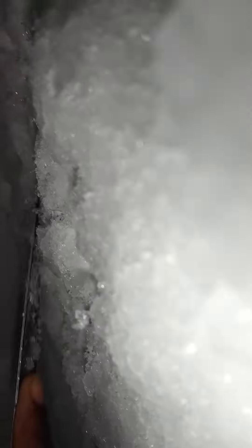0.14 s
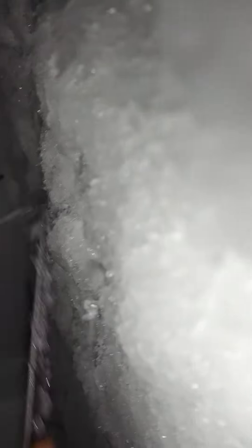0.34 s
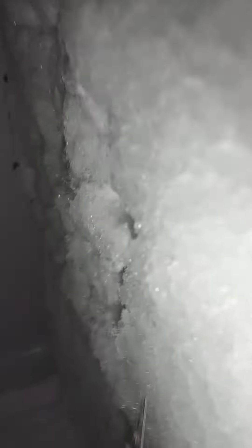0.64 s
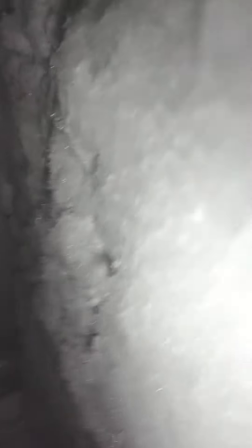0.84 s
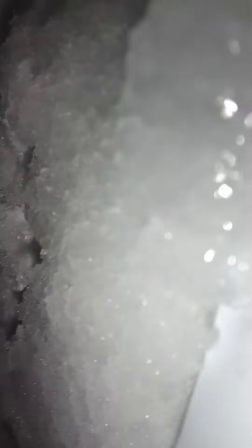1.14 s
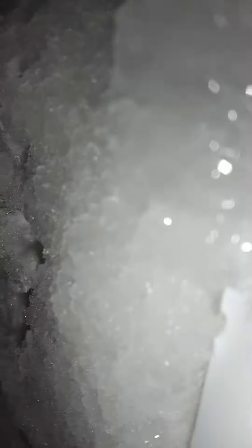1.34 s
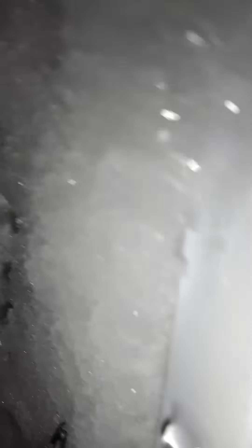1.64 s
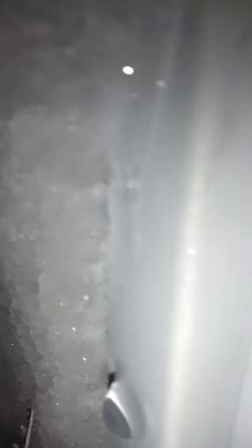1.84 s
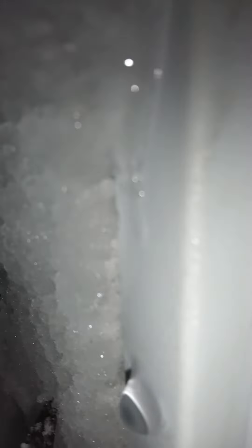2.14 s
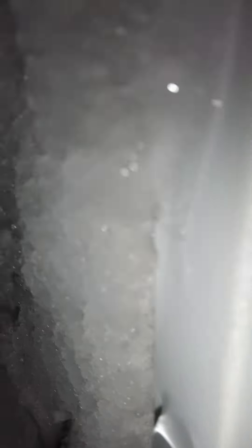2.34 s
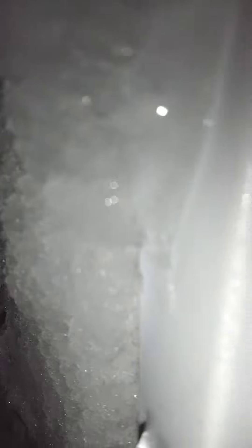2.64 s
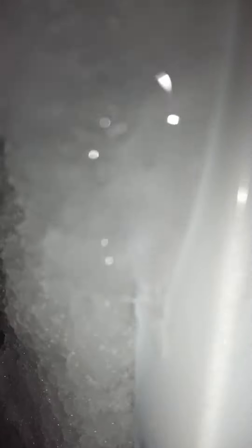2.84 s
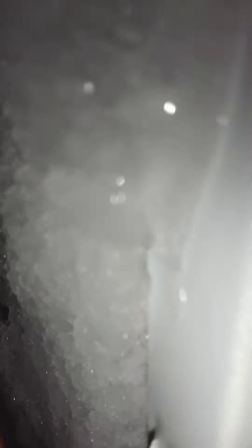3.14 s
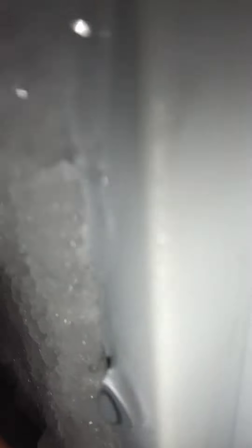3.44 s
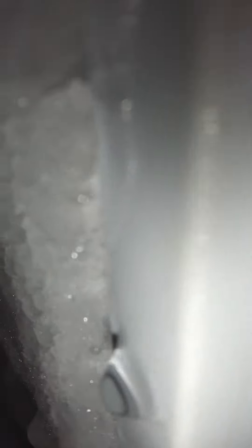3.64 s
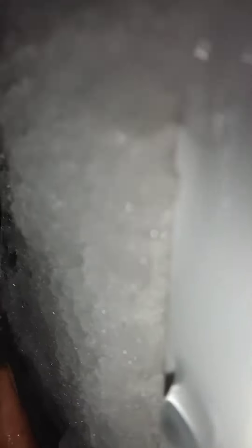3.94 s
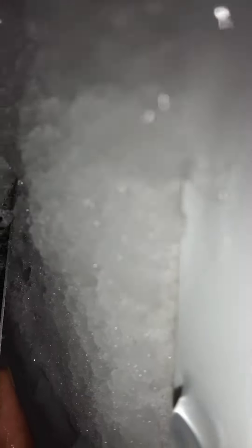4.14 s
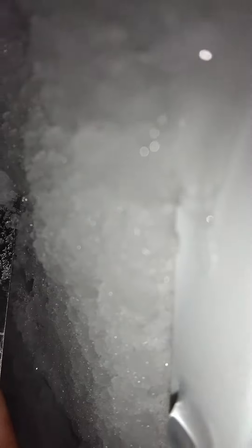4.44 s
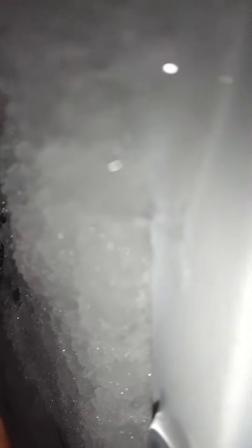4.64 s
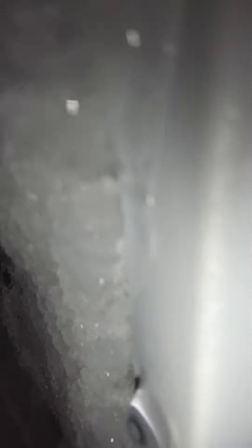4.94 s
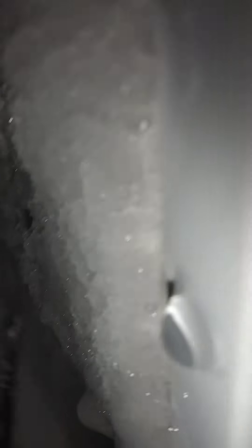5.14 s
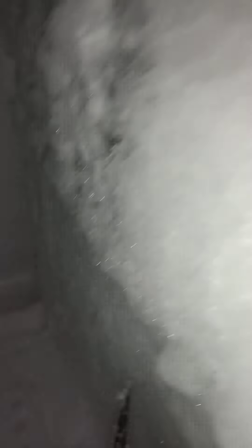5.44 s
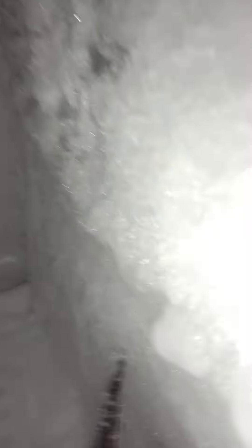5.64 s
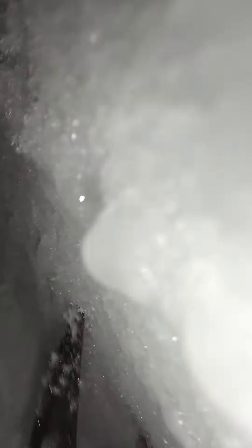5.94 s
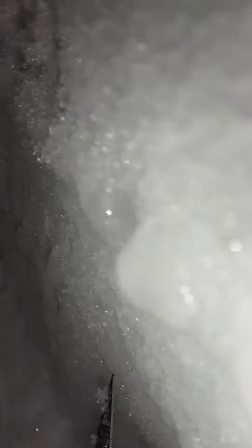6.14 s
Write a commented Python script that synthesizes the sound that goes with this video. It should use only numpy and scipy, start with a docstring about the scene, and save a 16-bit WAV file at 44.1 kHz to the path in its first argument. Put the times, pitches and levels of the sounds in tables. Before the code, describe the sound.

Close, dry cracks and gritty scrapes of a blade on crusted ice, dull thumps of a hollow freezer wall, icy grains falling between bursts.

```python
"""A knife jabs, chips and scrapes thick frost in a freezer, close by, amid knocks and falling crumbs.
Each contact is a run of tiny fractures, which excite ice crystals and, the deeper the bite, the blade's bending modes.
Jabs set the hollow wall swinging, loose grains tick down in flurries, and the edge squeaks at times.
Wall modes and decaying echoes prolong all of this, over the faint hush of a kitchen."""
import sys
import numpy as np
from scipy import signal
from scipy.fft import rfft, irfft
from scipy.io import wavfile
from scipy.ndimage import map_coordinates

SR = 44100
rng = np.random.default_rng(int(sys.argv[2]) if len(sys.argv) > 2 else 0)


def unload_audio(sound):
    """Save the sound as a 16-bit wav file, at the path given as the first command line argument."""
    columns = np.transpose(np.atleast_2d(sound))
    # keep every value between -1 and 1, then stretch to whole-number steps
    steps = np.round(np.clip(columns, -1, 1) * 32767)
    wavfile.write(sys.argv[1], SR, steps.astype(np.int16))


N = 276948

# Single flakes snapping off: t/s, level/dB, depth of the bite/dB
CHIPS = [(0.159, -38, 1.5), (0.452, -52, 11.5), (0.564, -37, -1.5), (.596, -44, 8), (.618, -61, -1),
         (.641, -36.5, -2), (.679, -48, 0), (.69, -43, -2), (0.696, -45, -12), (0.707, -46.5, 3),
         (0.723, -41.5, -1), (0.739, -42, -24), (0.743, -41.5, -4), (0.755, -45, -13), (.762, -46, -21),
         (0.79, -47.5, -1), (0.796, -47.5, 8), (1.079, -50.5, -16.5), (1.109, -48.5, -3.5),
         (1.177, -55, -9), (1.196, -48, -14), (1.213, -46.5, -2), (1.222, -44, -7), (1.247, -41, -18),
         (1.267, -41.5, -11.5), (1.309, -45, -12), (1.34, -47.5, -8), (1.363, -35, -34), (1.371, -39.5, -4),
         (1.425, -36.5, 2), (1.588, -43.5, -13), (1.607, -50, 1), (1.679, -54, -33), (1.826, -47.5, -17.5),
         (1.914, -50.5, -45), (2.079, -57, -59), (2.152, -48.5, -67), (2.255, -58, -46), (2.49, -53, -0.5),
         (2.729, -48.5, -14), (2.795, -49, -22), (2.851, -53.5, -17.5), (2.874, -61.5, 16),
         (3.048, -45.5, -18), (3.254, -38, -14.5), (3.315, -37.5, 5), (3.329, -41, 6), (3.378, -41.5, 9),
         (3.749, -45, -44), (3.808, -55.5, 8), (3.91, -56.5, -70.5), (3.972, -47, -21),
         (4.014, -40.5, -12.5), (4.14, -42, -2.5), (4.255, -30.5, 0.5), (4.391, -32.5, 7),
         (4.401, -31.5, 6.5), (4.41, -31, 9.5), (4.43, -35, -8.5), (4.438, -34.5, -0.5), (4.449, -29, -0.5),
         (4.567, -46.5, -10), (4.614, -39, -14), (4.662, -43.5, -15), (4.736, -44.5, -14.5),
         (4.895, -50, -3.5), (5.101, -53.5, -35), (5.418, -48.5, -25), (5.484, -39.5, -6),
         (5.516, -49.5, -14), (5.581, -41.5, -13), (5.633, -39, -11), (6.061, -56, -50), (6.168, -45, 3.5),
         (6.195, -37.5, -11), (6.209, -36.5, -8.5), (6.221, -37.5, -7), (6.251, -51, -3)]
CRACK_GROWTH = .3  # dB by which a crack lengthens for each dB of depth


def chips(crack_s=0.0026, first_break=2.36, lead_db=-27, lead_s=0.02, snap_s=0.0031):
    """Brittle fracture: a short soft crackle swells into each main break, whose run dies later if deep."""
    out = np.zeros(N)
    t = clock(.026) - .006  # zero at the main break
    stream = fractures(rate=2000, spread_db=2.5)
    flakes = rng.standard_normal((len(CHIPS), 1024))
    for (start, db, depth_db), flake in zip(CHIPS, flakes):
        run_s = crack_s * undb(CRACK_GROWTH * depth_db)
        crackle = undb(lead_db) * np.exp(-abs(t) / lead_s)
        run = np.exp(-abs(t) / run_s)
        force = excerpt(stream, start, t) * np.where(t < 0, crackle, run)
        force[np.searchsorted(t, 0)] += first_break
        add(out, start + t[0], radiate(force, start, db, depth_db, snap_s, flake, ring_s=0.0015))
    return out


# Strokes of the blade ploughing through frost: start t/s, end t/s, level/dB, depth of the bite/dB
STROKES = [(0.154, 0.161, -55, 10), (0.482, 0.497, -70, 13.5), (0.533, 0.574, -49, -1),
           (0.6, 0.622, -68, 19.5), (0.679, 0.708, -60, 11.5), (0.718, 0.761, -61, 9),
           (1.204, 1.265, -66.5, 4.5), (1.332, 1.388, -50, -1.5), (1.383, 1.408, -41, -2),
           (1.418, 1.444, -45, 0), (1.905, 1.957, -64, -56), (2.116, 2.161, -63.5, -57),
           (2.471, 2.503, -50.5, -12.5), (2.723, 2.752, -55.5, -8.5), (2.83, 2.893, -54.5, -3),
           (3.03, 3.076, -52.5, -1.5), (3.26, 3.278, -43.5, -0.5), (3.311, 3.374, -41, -2),
           (3.849, 3.916, -65, -10.5), (3.981, 4, -46, -7.5), (4.098, 4.156, -56.5, -19),
           (5.096, 5.13, -59, -7), (5.418, 5.459, -51.5, -13.5), (5.457, 5.498, -48, -4),
           (5.638, 5.706, -45.5, -4.5), (6.157, 6.237, -67.5, 7)]
SWELL_DB = 10.5  # growth of the push through every stroke
WALL_DB, WALL_HZ = -49, 151  # level and pitch of the wall's rumble under a firm stroke
FIRM_DB = -47.5  # level plus depth of a firm stroke
WALL_GROWTH = 1.75  # dB of rumble for each dB above a firm stroke


def scrapes(grip_db=4, slip_hz=190, attack_s=0.0049, release_s=0.01, wall_s=0.002):
    """Stick-slip friction: the edge breaks the crust in bunches of fractures; deep strokes shake the wall."""
    out = np.zeros(N)
    stream = fractures(rate=7000, spread_db=1) * undb(grip_db * wander(slip_hz))
    flakes = rng.standard_normal((len(STROKES), 1024))
    wall = np.sin(2 * np.pi * WALL_HZ * clock(.12)) * np.exp(-clock(.12) / wall_s)
    wall = signal.sosfilt(signal.butter(3, 110, "high", fs=SR, output="sos"), wall)
    for (start, end, db, depth_db), flake in zip(STROKES, flakes):
        t = clock(end - start)
        swell = undb(SWELL_DB * t / t[-1])
        edges = np.minimum(t / attack_s, 1) * np.minimum((t[-1] - t) / release_s, 1)
        force = excerpt(stream, start, t) * swell * edges
        add(out, start, radiate(force, start, db, depth_db, t[-1], flake, ring_s=0.0013))
        rumble_db = WALL_DB + WALL_GROWTH * (db + depth_db - FIRM_DB)
        rumble = unit(signal.fftconvolve(force, wall)) * np.sqrt(len(t))
        add(out, start, undb(rumble_db) * rumble)
    return out


# The clamping of the blade by the ice, which retunes its bending modes; the nearest in time applies:
# t/s, nominal f/Hz of modes 1, 2, 3 and 4, mode 2 relative to mode 1 level/dB,
# upper pair relative to the crystals at zero depth level/dB
GRIPS = [(.16, 660, 1330, 2290, 2730, 4.5, -2), (.47, 938, 1310, 2250, 2770, -4, 8.5),
         (.555, 577, 1316, 2190, 2790, -2, -1.5), (.61, 766, 1310, 1920, 2200, -5, -2.5),
         (.72, 800, 1083, 2800, 3620, 1.5, -1), (1.16, 680, 1035, 2230, 3160, 8.5, 2.5),
         (1.39, 865, 1343, 2300, 3044, -2, -3), (1.85, 895, 1290, 2100, 3100, -10, 14),
         (2.48, 840, 1120, 2040, 3340, -14, -5), (2.73, 955, 1154, 2115, 3000, -2, -1.5),
         (2.9, 707, 1316, 2150, 2300, -9, -4), (3.265, 624, 1306, 2121, 2400, 3.5, -5),
         (3.33, 743, 1420, 2110, 2720, 2.5, -6.5), (3.81, 913, 1310, 2130, 2155, -13, -3.5),
         (3.99, 1280, 1520, 2170, 2530, -1.5, -14.5), (4.14, 800, 1305, 2209, 3360, -3, -15.5),
         (4.26, 503, 1380, 2403, 2840, -4.5, -3.5), (4.41, 860, 1390, 2365, 2750, -2.5, -2),
         (4.66, 1242, 2010, 2721, 3570, 5, -4.5), (4.89, 520, 1286, 2150, 2270, -9, -10),
         (5.46, 932, 1100, 1943, 2180, -13, 0), (5.66, 892, 1353, 1900, 2380, -2.5, -0.5),
         (6.2, 512, 964, 2099, 3310, 0.5, -1)]
UPPER_PER_DEPTH = 0.74  # dB of the upper modes for each dB of depth


def radiate(force, start, db, depth_db, seconds, flake, ring_s, lower_s=0.0049, upper_s=0.0027):
    """Modal excitation: a graze only sounds the crystals, a deep bite also bends the blade."""
    grip = min(GRIPS, key=lambda row: abs(row[0] - start))
    _, first_hz, second_hz, third_hz, fourth_hz, second_db, upper_db = grip
    t = np.arange(len(flake)) / SR
    crystal = signal.fftconvolve(flake * np.exp(-t / ring_s), response(crystal_colour(start)))
    out = np.zeros(len(force) + SR // 10)
    add(out, 0, undb(db) * unit(signal.fftconvolve(force, crystal)))
    lower_db = db + depth_db
    upper_db = db + upper_db + UPPER_PER_DEPTH * depth_db
    lower = bending(force, first_hz, lower_db, lower_s)
    lower = lower + undb(second_db) * bending(force, second_hz, lower_db, lower_s)
    upper = bending(force, third_hz, upper_db, upper_s)
    upper = upper + bending(force, fourth_hz, upper_db, upper_s)
    add(out, 0, undb(lower_db) * unit(lower) + undb(upper_db) * unit(upper))
    return out * np.sqrt(seconds * SR)


# Colour of breaking ice, from thick crust to fine crystals: f/Hz, relative level/dB
CRYSTAL = [(1700, -11), (2500, -2), (3800, 7), (5500, 6), (6700, 7.5), (7700, 12), (8900, -4), (11000, -6),
           (13500, -4), (15300, 0.5), (16000, -30)]
# Sparkle of the frost, high when fine and dry, low when packed: t/s, change of the top treble level/dB
SPARKLE = [(.2, -1), (.6, 7.5), (2.3, 11), (3.3, 1.5), (4.42, -4), (4.6, 8), (5.4, 4.5)]


def crystal_colour(start):
    """Spectral envelope: the ice's colour at a time, its treble raised or lowered by the sparkle."""
    hz, db = np.transpose(CRYSTAL)
    sparkle_db = np.interp(start, *np.transpose(SPARKLE))
    return np.column_stack([hz, db + sparkle_db * (hz > 8500)])


def bending(force, hz, db, decay_s, hard_db=-41, shift=0.02, shift_hz=70):
    """Damped resonance: one bending mode rings, shorter under a hard push, its pitch sliding with the grip."""
    t = clock(.05)
    hz = hz * (1 + rng.uniform(-.04, .04))  # every flake grips a little differently
    age = t / (decay_s * (1 - .82 / (1 + undb(hard_db - db))))  # in decay times
    mode = np.exp(2j * np.pi * (hz * t + rng.random()) - age) * (1 - np.exp(-age))
    rung = signal.fftconvolve(force, mode)
    slide = 2 * np.pi * hz * shift * np.cumsum(wander(shift_hz, len(rung))) / SR
    return unit(np.real(rung * np.exp(1j * slide)))


# Pushes that reach the wall: t/s, relative level/dB, middle of the sagging pitch f/Hz, decay time/cycles
KNOCKS = [(.165, -53, 198, 5.6), (0.544, -38.5, 210, 0.2), (0.7, -38.5, 199, 1.76),
          (1.257, -42.5, 223, 0.82), (1.378, -35.5, 420, 0.51), (1.4, -32.5, 328, 0.34),
          (1.432, -28.5, 206, 0.2), (1.609, -26, 274, 0.24), (1.611, -47, 650, 1.3), (1.938, -73, 475, 4.9),
          (3.062, -37.5, 179, 1.02), (3.266, -29.5, 182, 3), (3.34, -26.5, 490, 0.82),
          (3.346, -13, 272, 0.4), (3.352, -25, 326, 0.27), (3.362, -23.5, 127, 0.41), (4.014, -40, 173, 1),
          (4.143, -37.5, 186, 1.4), (4.26, -21.5, 280, 0.18), (4.414, -25.5, 135, 0.22),
          (4.896, -46.5, 523, 1.5), (5.691, -35, 198.7, 2.8), (5.698, -37, 357, 2.4), (5.82, -57, 507, 7.9),
          (6.254, -45, 578, 0.83)]


def knocks(swing_db=6.0, sag=0.054, judder_db=-49.0, judder_growth=0.49, build_s=0.0047, release_s=0.013):
    """Elastic rebound: the wall judders as the push builds, then springs back in a swing of sagging pitch."""
    out, t = np.zeros(N), clock(.08)
    around = clock(.1) - .04  # zero at the peak of the push
    push = np.exp(-abs(around) / np.where(around < 0, build_s, release_s))
    shudder = rng.standard_normal(N)
    for start, db, hz, cycles in KNOCKS:
        fading = np.exp(-t * hz / cycles)
        turns = np.cumsum(hz * (1 + sag * (2 * fading - 1))) / SR
        swing = np.sin(2 * np.pi * turns) * fading * (1 - np.exp(-t * hz * np.pi))
        add(out, start, undb(db + swing_db) * swing / np.sqrt(cycles))
        judder = unit(signal.fftconvolve(excerpt(shudder, start, around) * push, swing))
        judder = judder * np.sqrt((build_s + release_s) * SR)
        add(out, start + around[0], undb(judder_db + judder_growth * (db - FIRM_DB)) * judder)
    return high_pass(out, hz=86.0)


# Skids of the edge on glazed ice: start t/s, end t/s, level/dB, nominal pitch f/Hz
SQUEAKS = [(1.9, 2.13, -73, 3480), (3.742, 3.8, -70, 2700), (5.893, 5.97, -79, 3050)]


def squeaks(waver=.035, rough_db=6, slip_hz=420):
    """Frictional self-oscillation: the skidding edge sings one tone, unsteady in pitch and level."""
    out = np.zeros(N)
    for start, end, db, hz in SQUEAKS:
        size = len(clock(end - start))
        tone = np.sin(2 * np.pi * np.cumsum(hz * (1 + waver * wander(slip_hz, size))) / SR)
        swell = np.sqrt(np.hanning(size)) * undb(rough_db * wander(slip_hz, size))
        add(out, start, undb(db) * unit(tone * swell) * np.sqrt(size))
    return out


# Colour of loose crumbs: f/Hz, relative level/dB
CRUMB_COLOUR = [(2400, -27.5), (3800, -4), (5500, -3), (7500, 6.5), (8900, -7.5), (13500, -5.5),
                (15300, -0.5), (16000, -5)]
FLURRY_DB, FLURRY_HZ = 4.5, 22  # spread of the clusters' level, clusters a second


def crumbs(drift_db=2, drift_hz=7, tick_s=0.0029):
    """Granular flow: loose grains fall in flurries of bright ticks, their level drifting slowly at random."""
    t = clock(.008)
    flurries = fractures(rate=3500, spread_db=11.0)
    flurries = flurries * undb(FLURRY_DB * wander(FLURRY_HZ) + drift_db * wander(drift_hz))
    # every grain crumbles in its own way: a decaying burst of noise
    ticks = signal.fftconvolve(abs(flurries), np.exp(-t / tick_s))[:N] * rng.standard_normal(N)
    grains = signal.fftconvolve(ticks, response(CRUMB_COLOUR))[:N]
    return unit(grains) * np.sqrt(N) * brushing()


# Passes of the blade over loose frost, shedding crumbs: start t/s, end t/s, level/dB
BRUSHES = [(0.494, 0.683, -65.5), (1.095, 1.738, -66), (1.783, 2.152, -68.5), (2.779, 2.997, -67),
           (3.754, 3.908, -62), (3.95, 4.236, -67.5), (4.442, 4.798, -64), (5.031, 5.122, -73),
           (5.43, 5.74, -67.5), (6.13, 6.248, -69.5)]
BRUSH_ATTACK_S, TRICKLE_S = 0.04, 0.12  # crumbs start quickly and go on falling for a moment


def brushing():
    """Exponential build-up and decay: the crumbs' flow rises to each touch, holds, and dies after the lift."""
    t = np.arange(N) / SR
    flows = []
    for start, end, db in BRUSHES:
        before = np.maximum(start - t, 0) / BRUSH_ATTACK_S
        after = np.maximum(t - end, 0) / TRICKLE_S
        flows.append(undb(db) * np.exp(-before - after))
    return np.max(flows, axis=0)


# Modes of the hollow wall: f/Hz, relative level/dB, t60/s
WALL_MODES = [(124, 2, .85), (134, -4, .7), (164, -8, .7), (200, -2.5, .55), (272, -1, .4), (375, -5, .45),
              (490, -1, .35), (533, -3.5, .3), (912, -8, .25)]
# Reverberation of the compartment: band centre f/Hz, level against the direct sound/dB, t60/s
CAVITY = [(128, -2.5, 1), (172, 1.5, 0.39), (380, -7.5, 0.46), (624, -6, 0.35), (1340, -6, 0.35),
          (2780, -12, 0.49), (5400, -17.5, 0.061), (10500, -22.5, 1)]


def compartment(x, modes_db=-55, build_s=0.0012):
    """Modal ringing and reverberation: the wall's modes ring while echoes decay band by band."""
    t = np.arange(SR) / SR
    ring = sum(undb(db + modes_db - 60 * t / t60) * np.cos(2 * np.pi * hz * t) for hz, db, t60 in WALL_MODES)
    for hz, db, t60 in CAVITY:
        edges = [hz / np.sqrt(2), min(hz * np.sqrt(2), SR * .45)]
        band = signal.butter(2, edges, "band", fs=SR, output="sos")
        echoes = signal.sosfilt(band, rng.standard_normal(SR))
        echoes = echoes * undb(-60 * t / t60) * (1 - np.exp(-t / build_s))
        ring = ring + unit(echoes) * undb(db) * np.sqrt(np.sqrt(2) * hz / SR)
    # the lumpy frost scatters the sound: a time jitter that smears the treble in the echoes
    jitter = .00005 * SR * wander(700)
    scattered = map_coordinates(x, [np.arange(N) + jitter], order=3)
    return signal.fftconvolve(scattered, ring)[:N]


# Colour of the quiet kitchen: f/Hz, relative spectral density level/dB
ROOM = [(18, -45), (30, -13.5), (131, 5), (245, -6.5), (415, 3), (684, -12), (1430, -9), (1720, -17),
        (5590, -42), (7470, -13.5), (8740, -41), (16000, -29)]
ROOM_DB = -71


def room():
    """Stationary noise: the faint steady hush of the kitchen, random noise shaped by a fixed spectrum."""
    return undb(ROOM_DB) * signal.fftconvolve(rng.standard_normal(N), response(ROOM, size=4096))[:N]


def fractures(rate, spread_db):
    """Random impulse process: breaking ice bonds give many small clicks and a few large ones."""
    size = undb(spread_db * np.minimum(rng.exponential(size=N), 4))
    return (rng.random(N) < rate / SR) * rng.choice([-1, 1], N) * size


def excerpt(stream, start, t):
    """Windowing: the stretch of a stream as long as t, from a time rounded to 10 ms."""
    return stream.take(int(round(start, 2) * SR) + np.arange(len(t)), mode="wrap")


def wander(rate, size=N):
    """Slow random modulation: a value that drifts to a new target at a given rate per second."""
    steps = np.clip(rng.standard_normal(4096), -2, 1.3)
    return np.interp(np.arange(size) / SR * rate, np.arange(len(steps)), steps)


def response(points, size=1024):
    """Minimum phase: the causal impulse response of a (f/Hz, level/dB) colour, with an energy of one."""
    hz, db = np.transpose(points)
    log_hz = np.log(np.fft.rfftfreq(size, 1 / SR) + 1)
    log_gain = np.log(undb(np.interp(log_hz, np.log(hz), db)))
    # folding the cepstrum onto positive times makes the response causal
    cepstrum = irfft(log_gain)
    cepstrum[1:size // 2] *= 2
    cepstrum[size // 2 + 1:] = 0
    return unit(irfft(np.exp(rfft(cepstrum))))


def high_pass(x, hz):
    """High-pass filtering: a steep cut of the bass."""
    return signal.sosfilt(signal.butter(4, hz, "high", fs=SR, output="sos"), x)


def undb(db):
    """Logarithmic level: decibels to amplitude gain."""
    return 10 ** (np.asarray(db) / 20)


def unit(x):
    """Energy normalisation: scale to an energy of one."""
    return x / np.sqrt(np.sum(x ** 2) + 1e-20)


def clock(seconds):
    """Uniform sampling: sample times of a short sound, eight at least."""
    return np.arange(max(int(seconds * SR), 8)) / SR


def add(out, start, x):
    """Superposition: mix x into out from a time on."""
    i = min(max(int(start * SR), 0), N)
    out[i:i + len(x)] += x[:N - i]


def scene():
    """Superposition: knife work and falling frost, the compartment's ringing, and the room."""
    work = high_pass(chips() + scrapes(), hz=101) + knocks() + squeaks() + crumbs()
    return (work + compartment(work) + room())[None]


TOP_HZ = 15900


def record(dry):
    """Low-pass filtering: an elliptic filter cuts the top of the treble."""
    return signal.sosfilt(signal.ellip(8, .2, 80, TOP_HZ, fs=SR, output="sos"), dry)


dry = scene()
out = record(dry)
unload_audio(out)
```